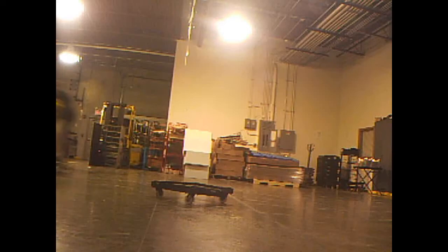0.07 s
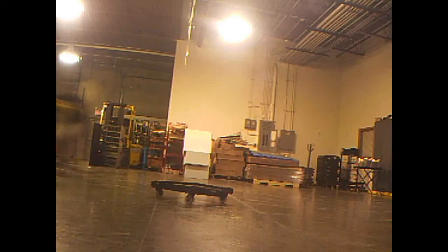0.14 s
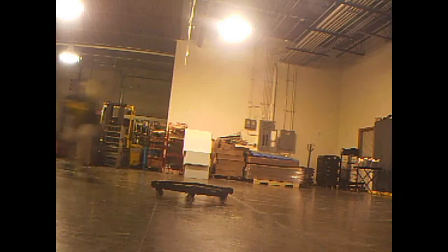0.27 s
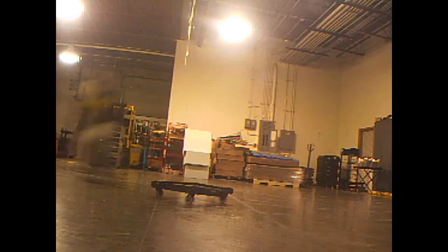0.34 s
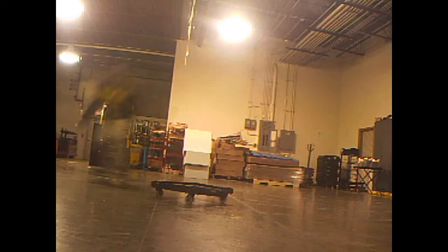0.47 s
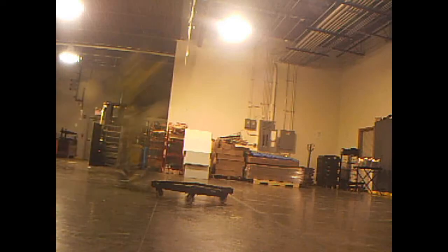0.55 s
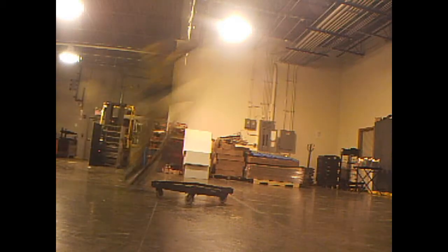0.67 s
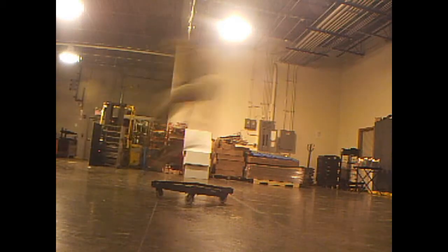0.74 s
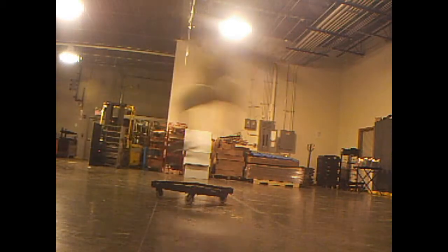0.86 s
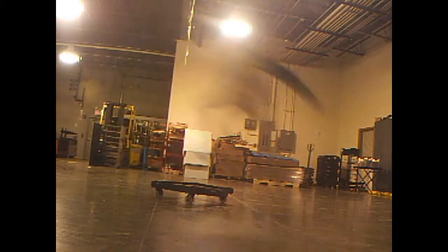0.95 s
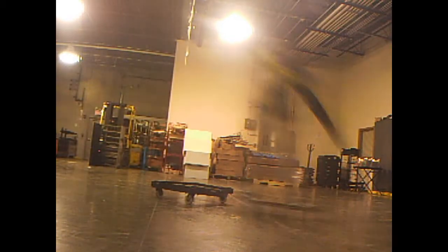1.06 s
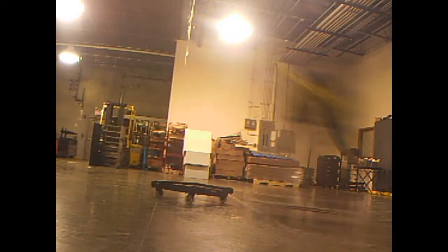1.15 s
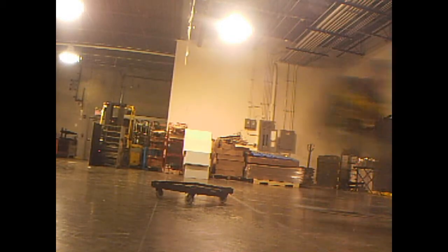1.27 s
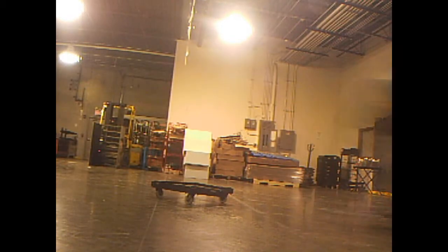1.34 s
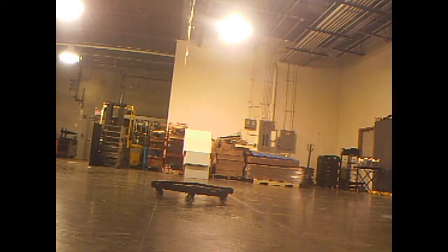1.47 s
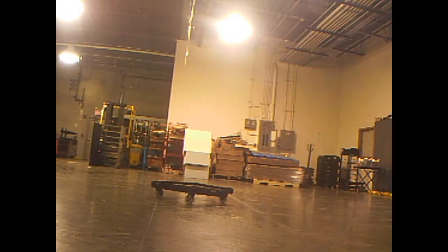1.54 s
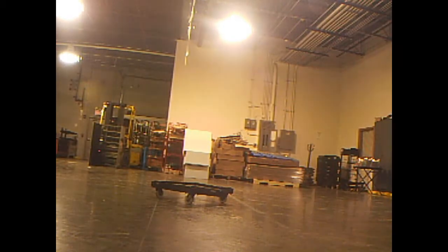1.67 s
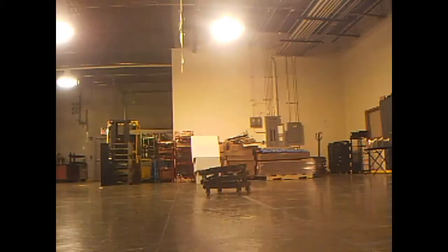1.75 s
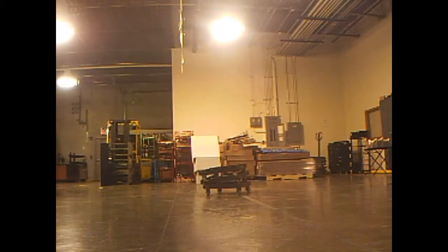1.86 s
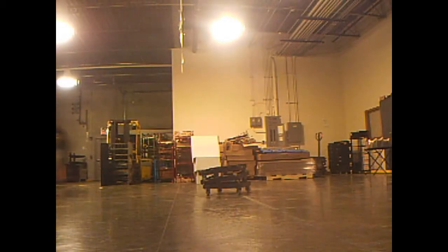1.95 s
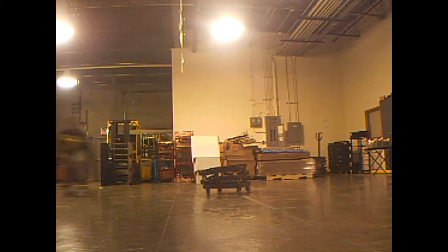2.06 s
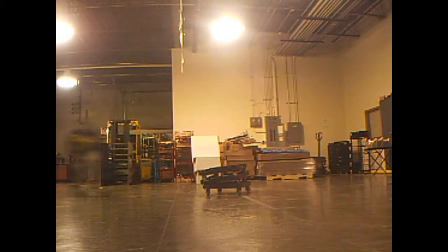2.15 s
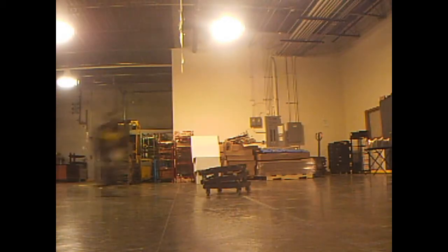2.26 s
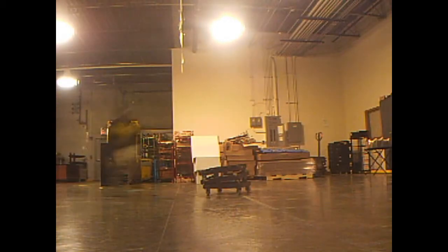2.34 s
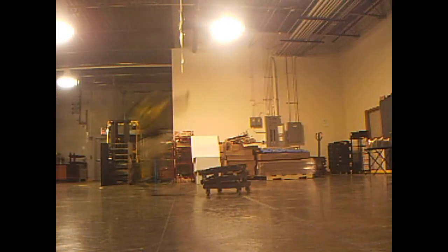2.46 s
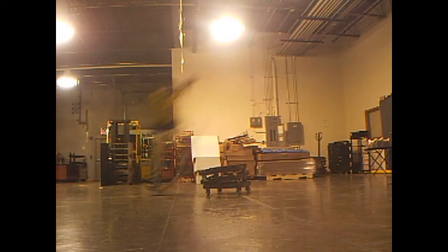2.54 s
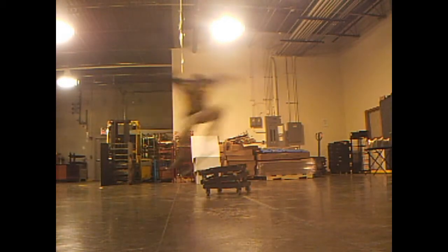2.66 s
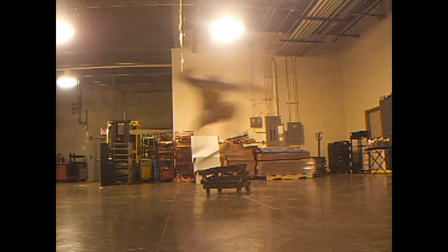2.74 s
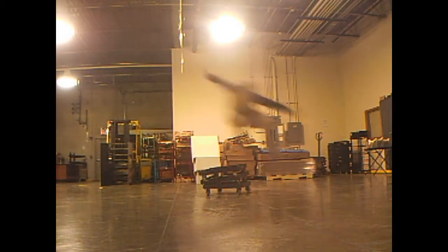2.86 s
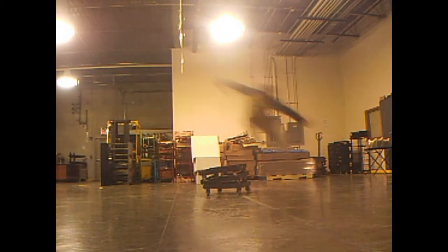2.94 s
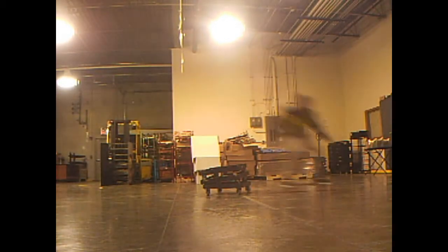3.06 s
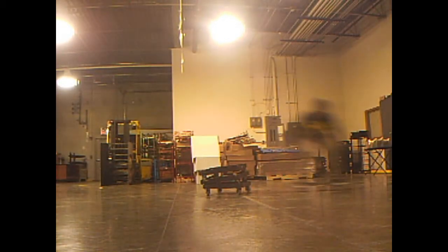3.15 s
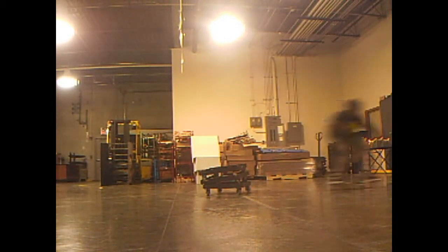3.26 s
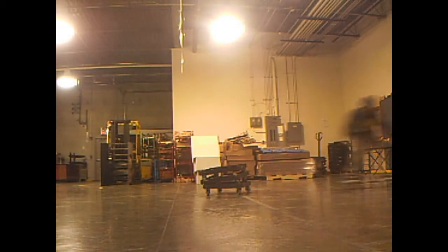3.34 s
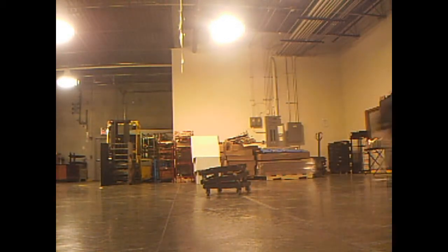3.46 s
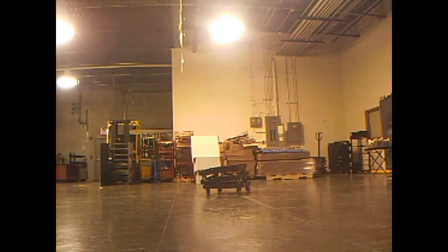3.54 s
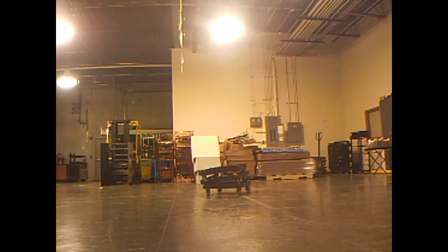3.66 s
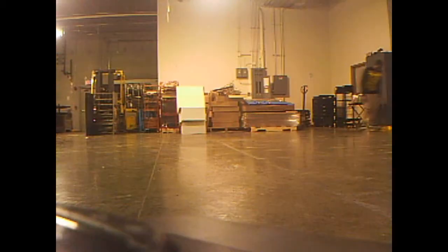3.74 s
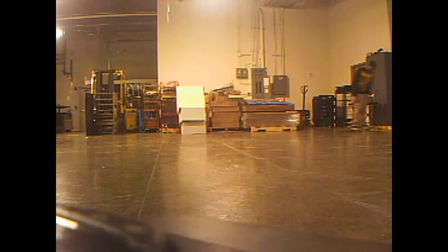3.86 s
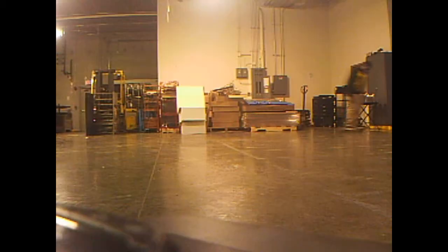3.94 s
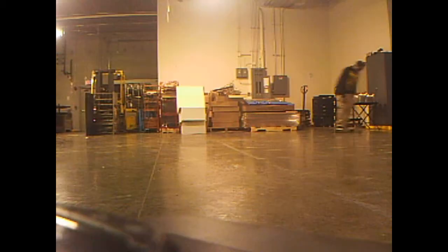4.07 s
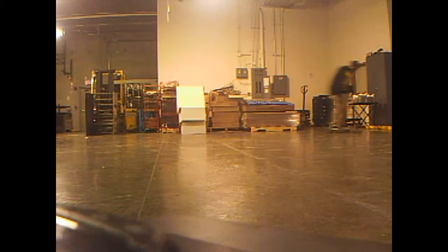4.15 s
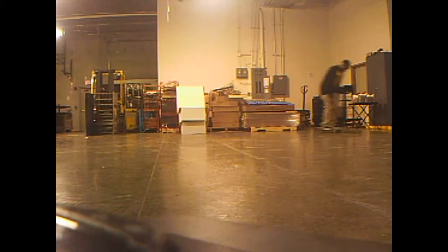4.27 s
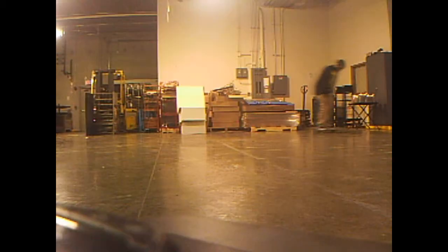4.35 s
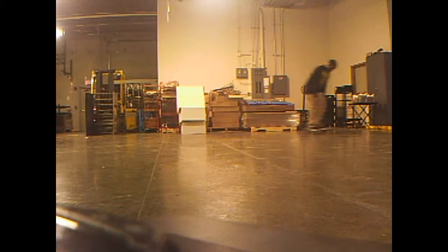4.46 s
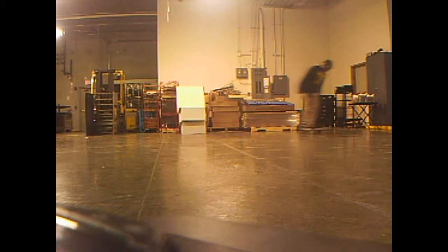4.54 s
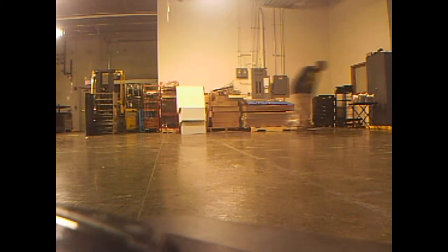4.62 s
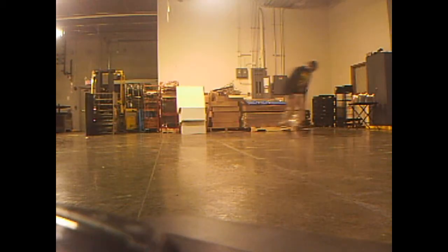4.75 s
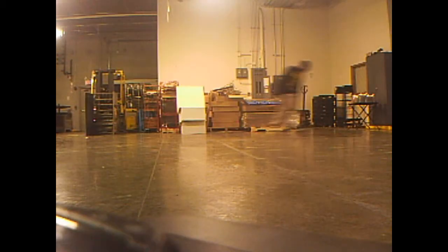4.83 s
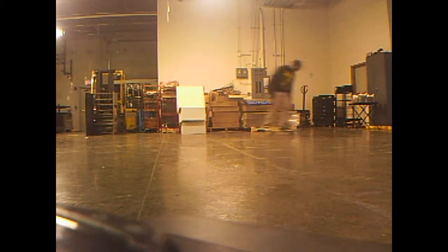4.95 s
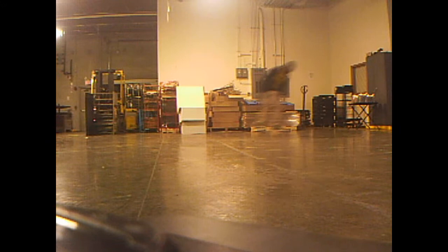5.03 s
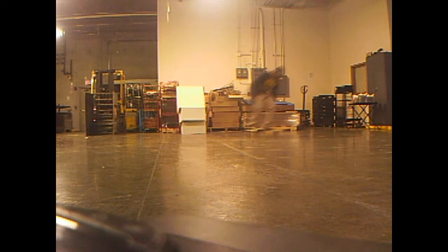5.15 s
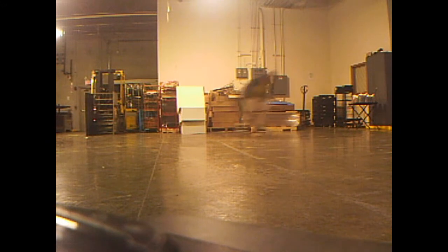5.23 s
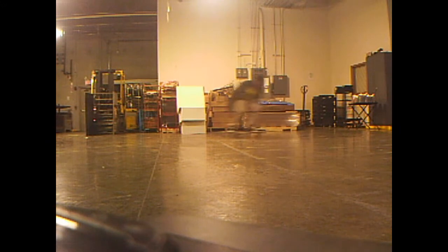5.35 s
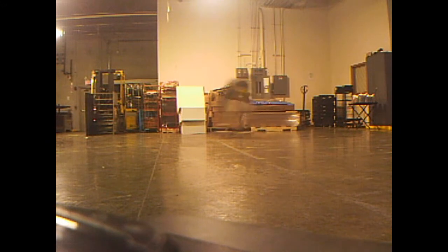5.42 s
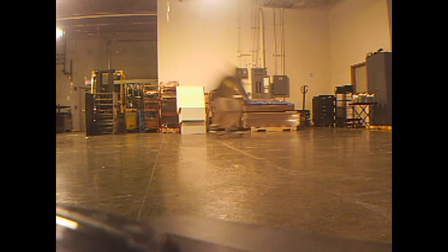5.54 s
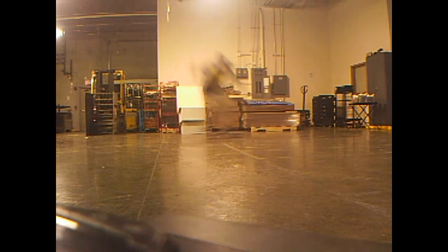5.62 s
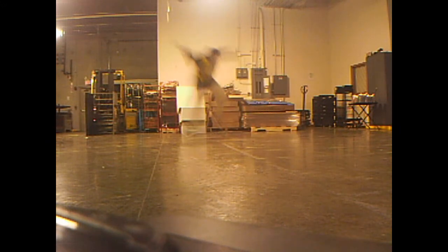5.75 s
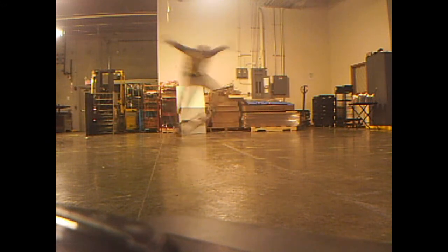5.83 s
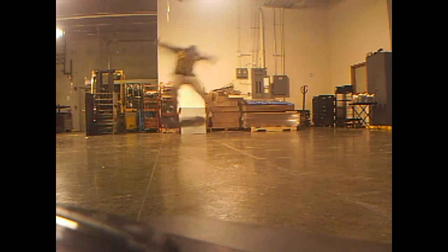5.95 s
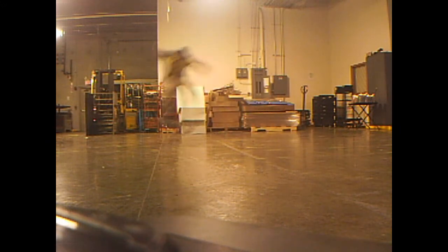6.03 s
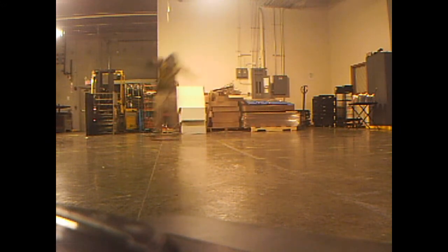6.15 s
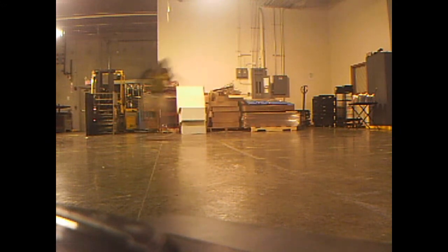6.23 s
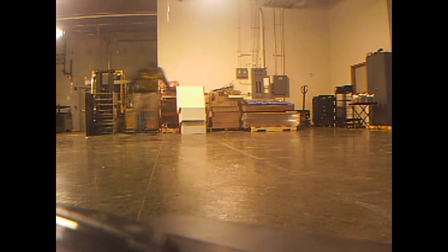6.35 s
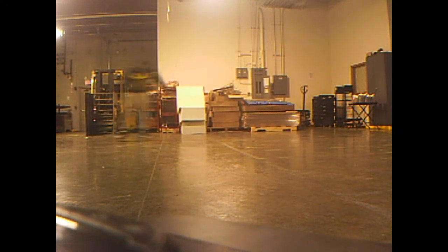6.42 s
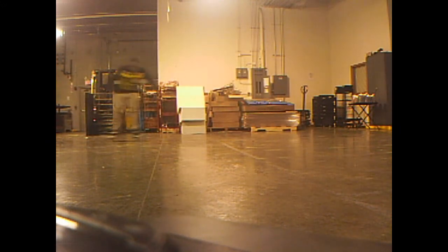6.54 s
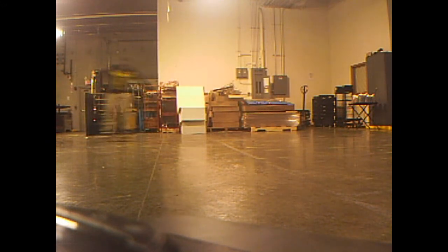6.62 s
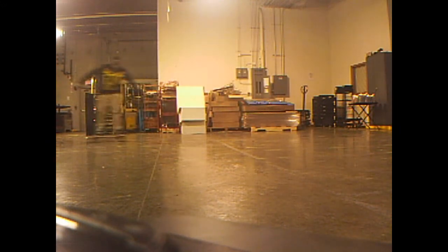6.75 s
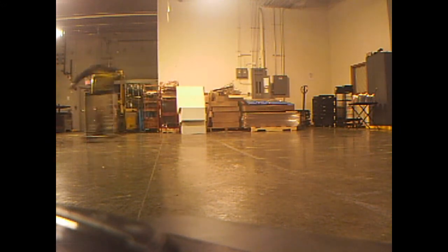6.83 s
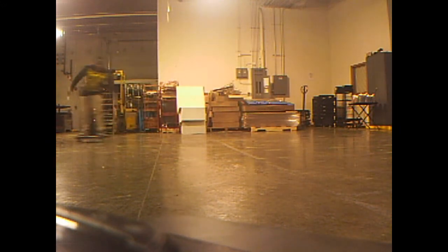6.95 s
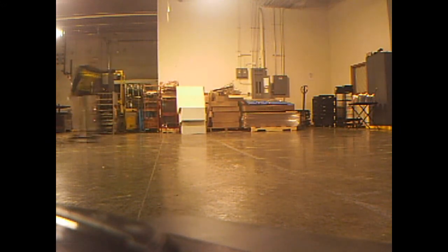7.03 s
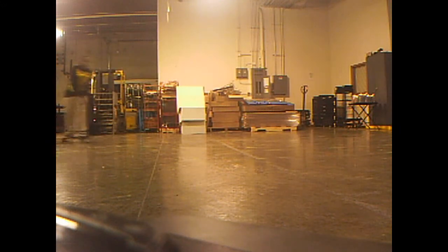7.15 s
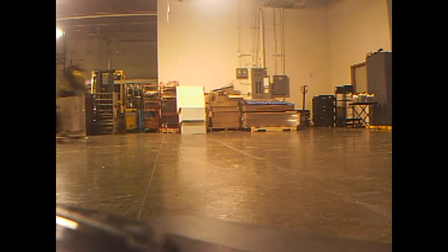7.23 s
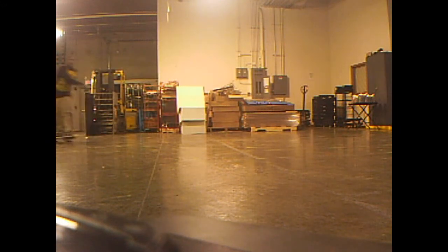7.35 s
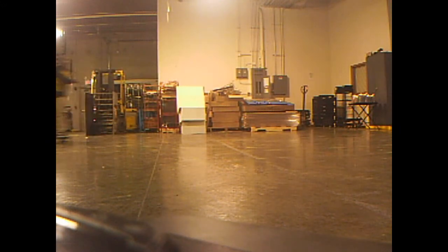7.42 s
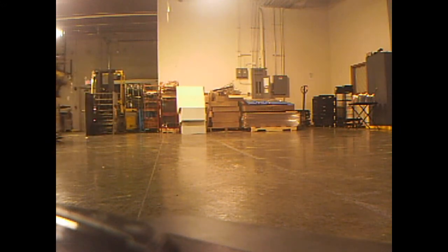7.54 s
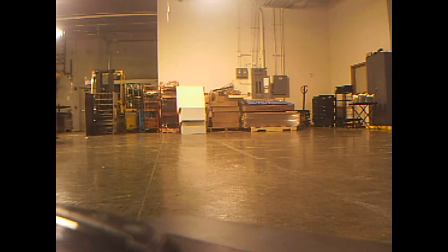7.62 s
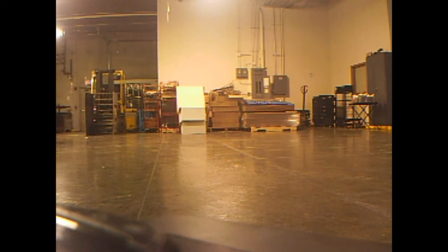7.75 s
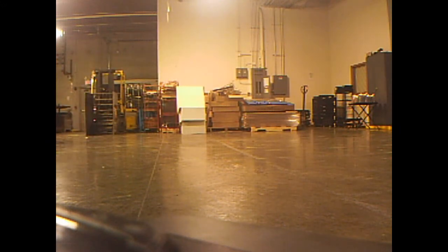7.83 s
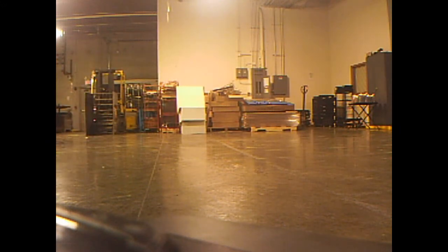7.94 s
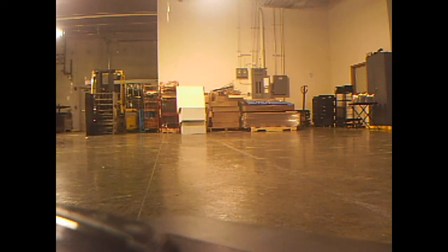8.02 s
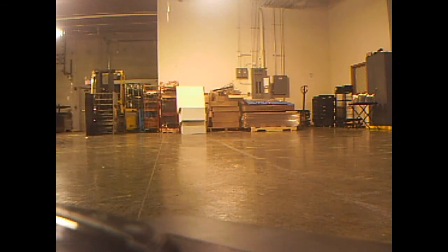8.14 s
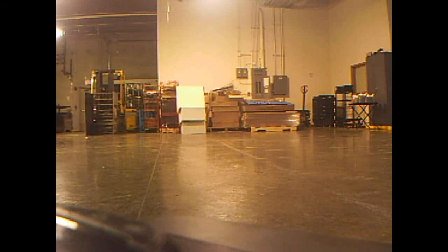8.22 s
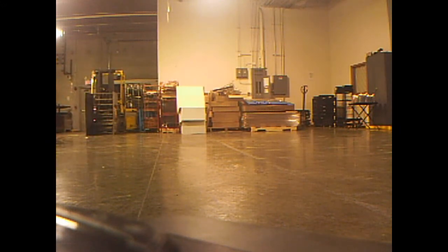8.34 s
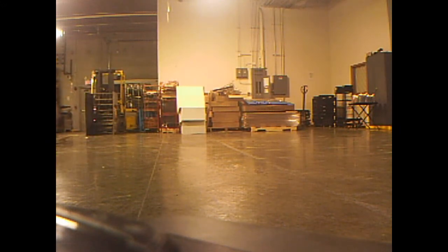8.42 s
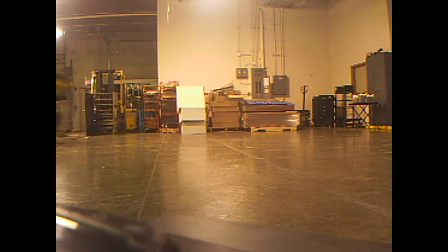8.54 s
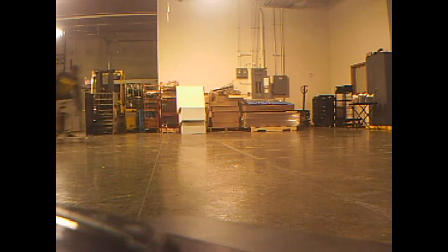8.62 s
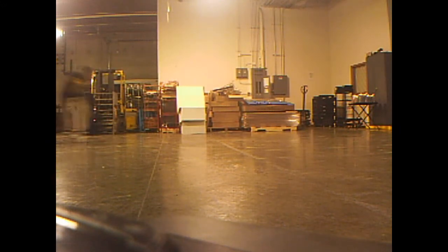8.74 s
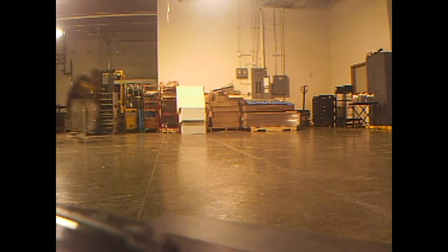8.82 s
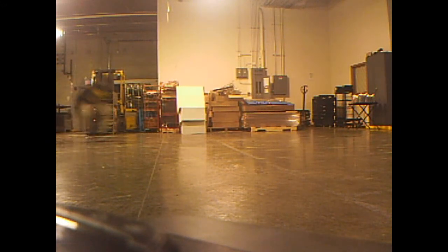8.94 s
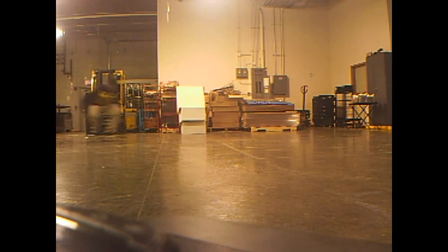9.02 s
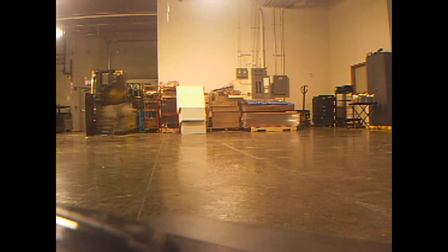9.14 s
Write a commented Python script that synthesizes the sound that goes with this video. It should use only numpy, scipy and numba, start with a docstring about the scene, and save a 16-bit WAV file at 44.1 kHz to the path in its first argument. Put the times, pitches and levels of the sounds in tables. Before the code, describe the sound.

In a big echoing warehouse, a skateboard rolls on smooth concrete with a low rumble and faint bearing hiss. Three jumps follow a few seconds apart, each a sharp wooden clack and then a heavy, clattering landing that makes the small microphone distort and dip in level. After the last, the wheels roar louder, knock over floor seams and recede. Soft shoe scuffs and a faint hum of air and lamps lie underneath.

```python
"""Skateboard jumps in an empty warehouse

Shoes scuff, wheels rumble over concrete, and the rider jumps three times. Each jump is a sharp pop
of the board's tail on the floor, a moment in the air and a heavy landing that booms round the hall.
Every hit sets the board ringing. We hear four shots, one after another, through a small camera:
the landings overload it, so it crackles and turns itself down."""
import sys
import numpy as np
from scipy import signal
from scipy.io import wavfile
from scipy.ndimage import uniform_filter1d, minimum_filter1d
from numba import njit

SR = 44100
rng = np.random.default_rng(int(sys.argv[2]) if len(sys.argv) > 2 else 0)


def wav_out(sig):
    """Save sig, one row per channel (or a flat mono array), as 16-bit PCM at SR to the path in sys.argv[1]."""
    wavfile.write(sys.argv[1], SR, np.round(np.clip(np.atleast_2d(sig).T, -1, 1) * 32767).astype(np.int16))


N = 405279
TIME = np.arange(N) / SR

# where each shot starts, and where the last one ends: time_s
SHOT_EDGES = [0.058, 1.86, 3.82, 7.95, 9.2]
# shoes scuffing as the rider pushes off or sets his feet: start_s, level_db
SCUFFS = [(0.02, -29), (4.52, -35.5), (5.67, -39), (7.95, -39), (8.44, -50), (8.88, -46)]
# the board's run in each shot: closest_at_s, closest_m, rumble_db, hiss_db, landing_roar_db
RUNS = [(0.8, 6.6, -30.5, -49, 3), (2.8, 2.4, -30.5, -51, 0.5), (5.9, 9.5, -35, -55.5, 11.5),
        (9.6, 8.4, -35, -58.5, 0)]
# swells of the board's drone: loudest_at_s, level_db, half_length_s
DRONES = [(0.404, -29, .35), (2.326, -27.5, 0.26), (3.868, -31, 0.34)]
# wheels knocking on floor joints: start_s, level_db, direct_db (added on the path to the camera)
JOINTS = [(0.394, -31, 9), (2.082, -31, 10), (4.003, -31, 0), (4.04, -31, 0), (6.689, -19, 12),
          (7.28, -29, -1), (7.296, -26, 1)]
# the tail strikes and the board rebounds: start_s, strike_db, direct_db, rebound_db, rebound_direct_db
POPS = [(0.642, -10.5, 7.5, -5.5, .5), (2.552, -11, 2.5, -5.5, -0.5), (5.790, -12.5, -7.5, -6.5, -3.5)]
# the tail scraping the floor: loudest_at_s, pitch_hz, level_db, half_length_s
SQUEAKS = [(0.667, 2380, -8, .003), (2.575, 2650, -13, .005), (5.852, 2270, -9.5, .007)]
# volleys of landing slams: start_s, level_db, direct_db, gap_s, first_db, last_db, tilt_db_per_octave
LANDINGS = [(1.021, 3, 6.5, 0.016, -0.5, 0.5, .5), (2.97, 5.54, 9, 0.024, -1.5, -9, -0.27),
            (6.141, 7.506, -1, .0145, -3, -3, 0.48)]
# lighter slaps of the board around a landing: start_s, level_db, direct_db, length_s, tilt_db_per_octave
SLAPS = [(1.0168, -7, 4, .04, 1), (1.117, -2, 7, .06, 0), (1.149, -3, 7, .1, 0), (3.085, -2, 12, .022, 1),
         (6.1155, -12, 3, .025, -3), (6.133, -10, -1, .05, -1), (6.251, -6, 12, .012, 2)]
# the notes that the board and its axles ring with: pitch_hz, level_db, fade_s (time to drop 60 dB)
BOARD_NOTES = [(438.3, -16, 0.074), (570.4, -8.5, 0.073), (706.7, -9, 0.15), (803.8, -10.5, 0.088),
               (911.2, -13.5, 0.17), (1144.6, -13, 0.12), (1375, -18.5, 0.1), (1642, -15.5, 0.065),
               (1995, -20.5, 0.21), (2324, -22, 0.023)]
# how long the hall echoes, from bass to treble: pitch_hz, fade_s
HALL_FADES = [(80, 3.2), (250, 1.64), (700, 2.02), (1500, 2.295), (2800, 1.8), (4500, 1.24), (8000, 0.81),
              (14000, 0.6)]

# Each sound's colour, meaning how strong it is from bass to treble: pitch_hz, level_db
AIR_COLOUR = [(20, 7), (45, -17), (72, 0), (95, -10), (125, -4), (170, -7.5), (300, -7), (700, -8.5),
              (2000, -18), (5000, -30.5), (10000, -38)]
SCUFF_COLOUR = [(200, -6.5), (650, 11), (1500, 1), (3500, -6), (6000, -17.5), (10000, -24.5)]
RUMBLE_COLOUR = [(60, -36.5), (160, -24), (260, -17.5), (380, -10.5), (540, -1), (740, -2.5), (1050, -7),
                 (1300, -13), (1780, -12.5), (2300, -23.5), (3500, -30), (4400, -40), (8000, -48)]
BEARING_COLOUR = [(1000, -13), (2200, -1), (3500, 2.5), (5000, -2.5), (7000, -9.5), (10000, -11)]
DRONE_COLOUR = [(150, -32), (270, -16), (370, -5), (450, 3.5), (560, -4), (800, -18), (2000, -53.5)]
KNOCK_COLOUR = [(30, -54), (100, -32.5), (200, -18), (330, -13.5), (450, -7), (560, -1.5), (720, -2),
                (950, -2), (1250, -5.5), (1800, -9.5), (3500, -15), (6300, -28.5), (10000, -41.5)]
POP_COLOUR = [(30, -33.5), (100, -20.5), (200, -14), (300, -4), (460, 2.5), (600, -5), (900, -5.5),
              (1400, 0), (2300, -4.5), (4000, -11.5), (6500, -23.5), (10000, -32.5)]
# how the microphone, and later the camera's electronics, dull the treble: pitch_hz, level_db
MICROPHONE_COLOUR = [(20, -0.5), (9700, -0.5), (10900, -9), (15000, -11.5)]
CAMERA_COLOUR = [(20, -4.5), (55, -1.5), (5000, -4), (8500, -6.5), (11000, -11.5), (13000, -19.5),
                 (16000, -23)]

PATHS = 4  # a hit travels one way to the camera and three ways to the walls


def gain_of(db):
    """Turns decibels into a number to multiply a sound by."""
    return 10 ** (np.asarray(db) / 20)


def evened(x):
    """Scales a signal to an average power of 1."""
    return x / np.sqrt(np.mean(x ** 2) + 1e-20)


def fade(t, fade_s):
    """A smooth fall that is 60 dB down after fade_s."""
    return np.exp(-np.log(1000) * t / fade_s)


def look_up(table, hz):
    """Reads between a table's rows, with pitch spaced in octaves."""
    pitches, values = np.transpose(table)
    return np.interp(np.log(hz + 1), np.log(pitches + 1), values)


def coloured(x, colour, tilt_db=0, size=4096):
    """Filters each row to a colour; a tilt above zero (dB per octave) makes it brighter."""
    hz = np.abs(np.fft.fftfreq(size, 1 / SR))
    octaves = np.log2(np.clip(hz, 300, 6000) / 1000)
    log_gain = np.log(gain_of(look_up(colour, hz) + tilt_db * octaves))
    taps = np.fft.ifft(np.exp(np.conj(signal.hilbert(log_gain)))).real  # rings after a hit, not before
    return signal.fftconvolve(x, taps[None, :size // 2], axes=1)[:, :x.shape[1]]


def noise(colour, patchy_db):
    """Coloured noise whose level drifts in patches of time and pitch."""
    hz, _, bands = signal.stft(rng.standard_normal(N), SR, nperseg=2048, noverlap=1536)
    patches = uniform_filter1d(rng.standard_normal(bands.shape), size=7, axis=0)
    patches = evened(uniform_filter1d(patches, size=7, axis=1))
    bands *= gain_of(look_up(colour, hz)[:, None] + patchy_db * patches)
    return evened(signal.istft(bands, SR, nperseg=2048, noverlap=1536)[1][:N])


def shots():
    """The stretch of samples that each shot covers."""
    return [slice(round(a * SR), round(b * SR)) for a, b in zip(SHOT_EDGES, SHOT_EDGES[1:])]


def air_and_lamps(air_db=-42, hum_db=-53, hum_hz=120):
    """Air moves through the building and the lamps hum."""
    air = gain_of(air_db) * noise(AIR_COLOUR, patchy_db=0.6)
    return air + gain_of(hum_db) * np.sqrt(2) * np.sin(2 * np.pi * hum_hz * TIME)


def shoe_scuffs(rise_s=0.07, fade_db_per_s=28):
    """Each rub of a sole rises quickly and dies away in the hall."""
    level = np.zeros(N)
    for start_s, db in SCUFFS:
        rise = np.clip((TIME - start_s) / rise_s, 0, 1)
        level += rise * gain_of(db - fade_db_per_s * np.maximum(TIME - start_s - rise_s, 0))
    return level * noise(SCUFF_COLOUR, patchy_db=1.5)


def rolling_wheels(speed_m_per_s=4, hall_radius_m=6.25, roar_s=0.91, airborne_db=-3.5):
    """Wheels rumble and bearings hiss, louder when near and after a landing; the rumble dips mid-jump."""
    rumble = noise(RUMBLE_COLOUR, patchy_db=1.2)
    hiss = noise(BEARING_COLOUR, patchy_db=1)
    roar = sum((TIME > s) * np.exp(-((TIME - s) / roar_s) ** 2) for s, *_ in LANDINGS)
    for shot, (closest_at_s, closest_m, rumble_db, hiss_db, roar_db) in zip(shots(), RUNS):
        distance_m = np.hypot(closest_m, speed_m_per_s * (TIME[shot] - closest_at_s))
        nearness = np.hypot(1, hall_radius_m / distance_m)  # at this radius, direct sound equals echo
        lift_db = roar_db * roar[shot] * (TIME[shot] > closest_at_s)
        rumble[shot] *= gain_of(rumble_db + lift_db) * nearness
        hiss[shot] *= gain_of(hiss_db + 1.95 * lift_db) * nearness  # the roar lifts the hiss more
    flying = sum(1. * ((TIME > pop[0]) & (TIME < landing[0])) for pop, landing in zip(POPS, LANDINGS))
    dip = gain_of(airborne_db * uniform_filter1d(flying, size=4000))
    return dip * (rumble + board_drone()) + hiss


def board_drone():
    """Under the rider's weight, the wheels make the board drone in low swells."""
    power = sum(gain_of(db) ** 2 / (1 + ((TIME - s) / half_s) ** 2) ** 2 for s, db, half_s in DRONES)
    return np.sqrt(power) * noise(DRONE_COLOUR, patchy_db=1.5)


def board_hit(colour, length_s, tilt_db, ring_db):
    """A short rattle of contact sets the board ringing, a little differently along each path."""
    t = np.arange(SR // 5) / SR
    rattle = evened(rng.standard_normal((PATHS, len(t))) * fade(t, length_s))
    ring = np.zeros_like(rattle)
    for hz, db, fade_s in BOARD_NOTES:
        note = np.sin(2 * np.pi * (hz * t + rng.random((PATHS, 1))))
        ring += gain_of(db) * evened(note * fade(t, fade_s))
    sound = coloured(rattle + gain_of(ring_db) * ring, colour, tilt_db)
    return sound / np.linalg.norm(sound, axis=1, keepdims=True) * np.sqrt(SR / 100)  # equal energy


def play_hits(hits, colour, ring_db):
    """Places hits in time, one row for each path; row 0 goes straight to the camera."""
    paths = np.zeros((PATHS, N))
    for start_s, db, direct_db, length_s, tilt_db in hits:
        sound = gain_of(db) * board_hit(colour, length_s, tilt_db, ring_db)
        sound[0] *= gain_of(direct_db)
        start = round(start_s * SR)
        paths[:, start:start + sound.shape[1]] += sound[:, :N - start]
    return paths


def joint_knocks(length_s=0.026, tilt_db=-5.5):
    """The wheels knock dully on the seams in the concrete."""
    return play_hits([(*joint, length_s, tilt_db) for joint in JOINTS], KNOCK_COLOUR, ring_db=-13.5)


def hall_echo(x, build_s=0.009, scatter_db=7):
    """Uneven early echoes off the walls thicken into a long wash whose treble dies first."""
    t = np.arange(2 * SR) / SR
    echoes = rng.standard_normal(len(t))
    echoes *= gain_of(scatter_db * rng.standard_normal(len(t)) * np.exp(-t / 0.35))
    echoes /= np.sqrt(uniform_filter1d(echoes ** 2, size=1500))
    hz, times, bands = signal.stft(echoes, SR, nperseg=256)
    bands *= fade(times, look_up(HALL_FADES, hz)[:, None])
    wash = signal.istft(bands, SR)[1][:len(t)]
    wash *= 1 - np.exp(-t / build_s)
    return signal.fftconvolve(x, wash / np.linalg.norm(wash))[:len(x)]


def tail_pops(strike_s=0.039, rebound_s=0.05, strike_tilt_db=1.5, shoe_tilt_db=2.5):
    """Three hits make a take-off: the tail strikes, the board rebounds on the shoes, a foot flicks it."""
    hits = []
    for start_s, db, direct_db, rebound_db, rebound_direct_db in POPS:
        strike = (start_s, db, direct_db, strike_s, strike_tilt_db)
        rebound = (start_s + 0.0155, rebound_db, rebound_direct_db, rebound_s, shoe_tilt_db)
        flick = (start_s + 0.0483, db - 14.5, direct_db + 5.5, strike_s, shoe_tilt_db)
        hits += [strike, rebound, flick]
    return play_hits(hits, POP_COLOUR, ring_db=-9)


def tail_squeaks(wall_db=-8.5):
    """The tail sticks and slips on the floor in tiny squeaks, loudest towards the camera."""
    paths = np.zeros((PATHS, N))
    for loudest_at_s, hz, db, half_s in SQUEAKS:
        swell = np.exp(-((TIME - loudest_at_s) / half_s) ** 2 / 2)
        paths += gain_of(db) * swell * np.sin(2 * np.pi * hz * TIME)
    paths[1:] *= gain_of(wall_db)
    return paths


def landing_slams(slams=6, length_s=0.078):
    """Four wheels and two feet slam down in turn, with lighter slaps of the board around them."""
    hits = []
    for start_s, db, direct_db, gap_s, first_db, last_db, tilt_db in LANDINGS:
        for k, progress in enumerate(np.linspace(0, 1, slams)):
            slam_db = db + first_db * (1 - progress) ** 4 + last_db * progress ** 2
            hits.append((start_s + k * gap_s, slam_db, direct_db, length_s, tilt_db))
    return play_hits(hits + SLAPS, KNOCK_COLOUR, ring_db=-12)


def scene():
    """Mixes rider, board and building; each new shot cuts off the echoes of the one before."""
    direct, *to_walls = tail_pops() + landing_slams() + joint_knocks() + tail_squeaks()
    near = direct + rolling_wheels() + shoe_scuffs() + air_and_lamps()
    mix = np.zeros(N)
    for shot in shots():
        echoes = sum(hall_echo(path[shot]) for path in to_walls) / np.sqrt(len(to_walls))
        soft_edges = signal.windows.tukey(len(echoes), 0.002)
        mix[shot] = (near[shot] + echoes) * soft_edges
    return mix[None]


@njit
def turn_down_db(peaks, limit, fall_db_per_s, most_db, hold_s, recover_db_per_s):
    """The camera turns itself down while peaks pass the limit, waits, then slowly comes back up."""
    cut_db, waited_s = 0., 0.
    cuts = np.zeros(len(peaks))
    for i in range(len(peaks)):
        waited_s += 1 / SR
        if peaks[i] * 10 ** (-cut_db / 20) > limit:
            cut_db = min(cut_db + fall_db_per_s / SR, most_db)
            waited_s = 0.
        elif waited_s > hold_s:
            cut_db = max(cut_db - recover_db_per_s / SR, 0.)
        cuts[i] = cut_db
    return cuts


def overload(x, flip_at=1.8, steepness_weight=0.95):
    """Loud peaks are flattened; the highest and steepest flip upside down and crackle."""
    flattened = x / (1 + x ** 8) ** (1 / 8)
    flipped = abs(x + steepness_weight * np.gradient(x)) > flip_at
    return np.where(flipped, -flattened, flattened)


def record(dry):
    """The small camera turns loud moments down, overloads on the peaks and dulls the treble."""
    x = coloured(dry, MICROPHONE_COLOUR)[0]
    for shot in shots():
        peaks = -minimum_filter1d(-abs(x[shot]), size=130)
        cut_db = turn_down_db(peaks, limit=1., fall_db_per_s=106., most_db=15.,
                              hold_s=0.33, recover_db_per_s=11.)
        x[shot] *= gain_of(-cut_db)
    x = coloured(overload(x)[None], CAMERA_COLOUR)
    x = np.clip(gain_of(1.2) * x, -1, 1)
    treble_cut = signal.firwin(511, cutoff=15750, window=("kaiser", 9), fs=SR)
    return signal.oaconvolve(x, treble_cut[None], "same")


dry = scene()
out = record(dry)
wav_out(out)
```